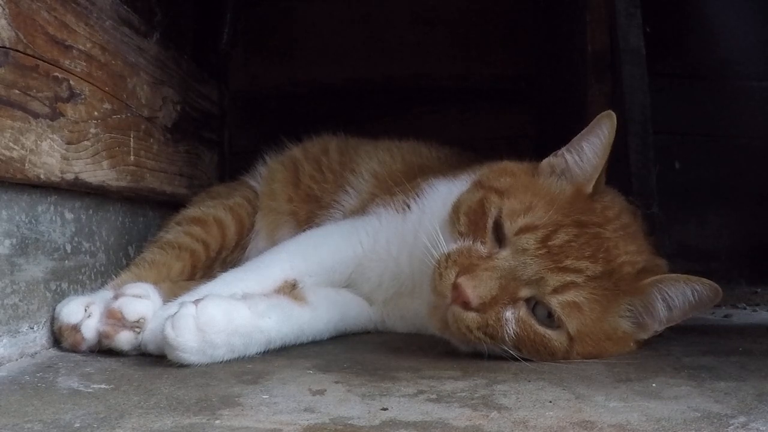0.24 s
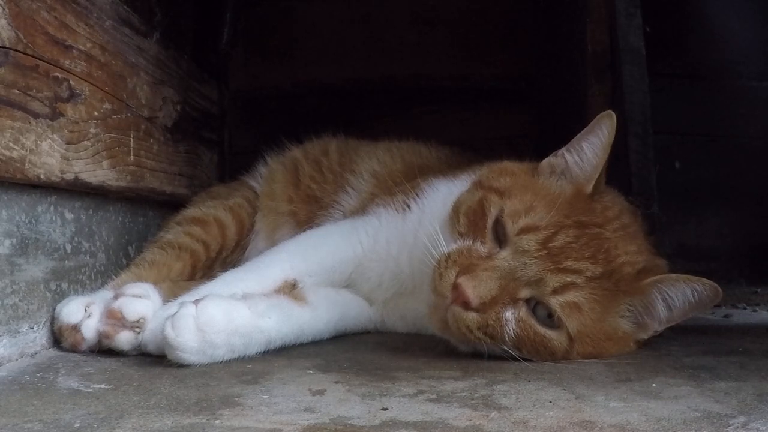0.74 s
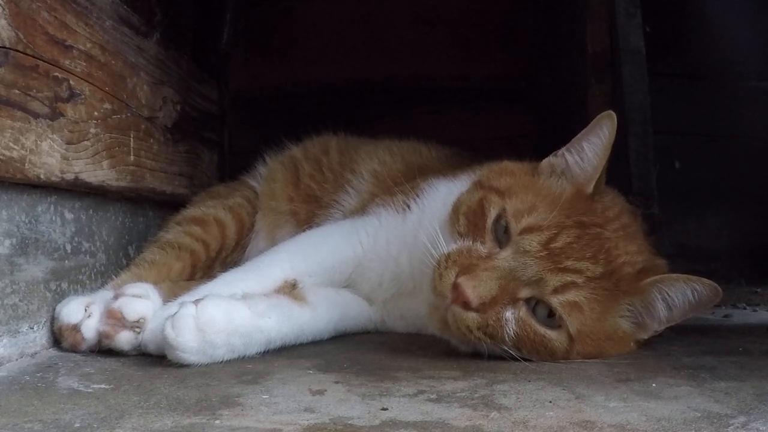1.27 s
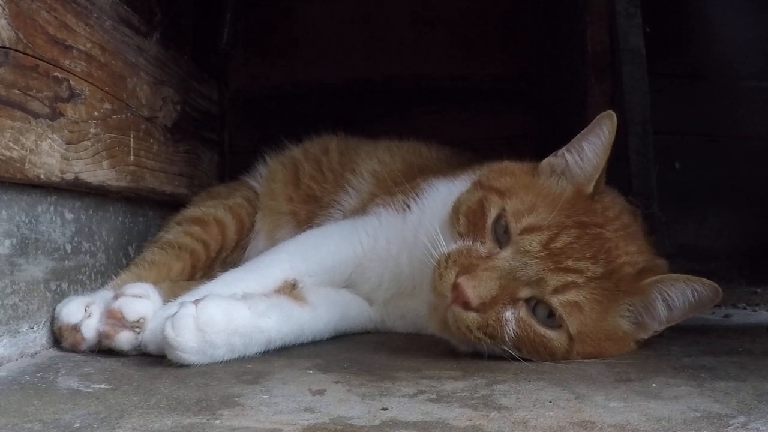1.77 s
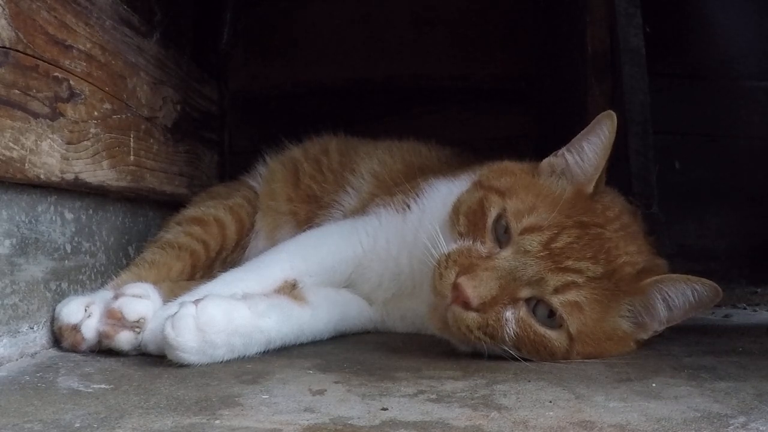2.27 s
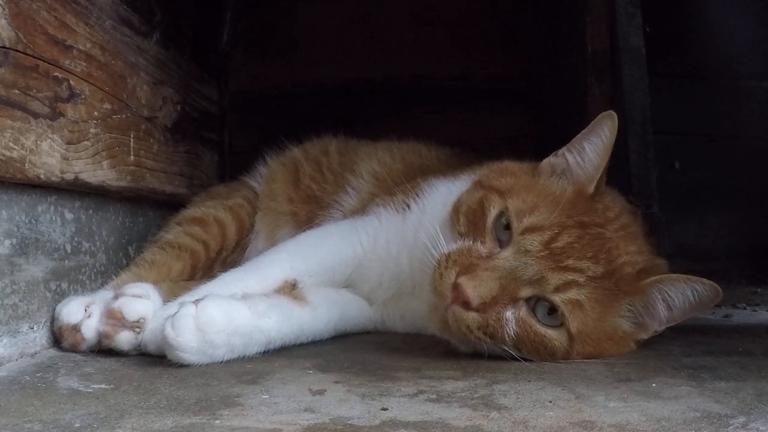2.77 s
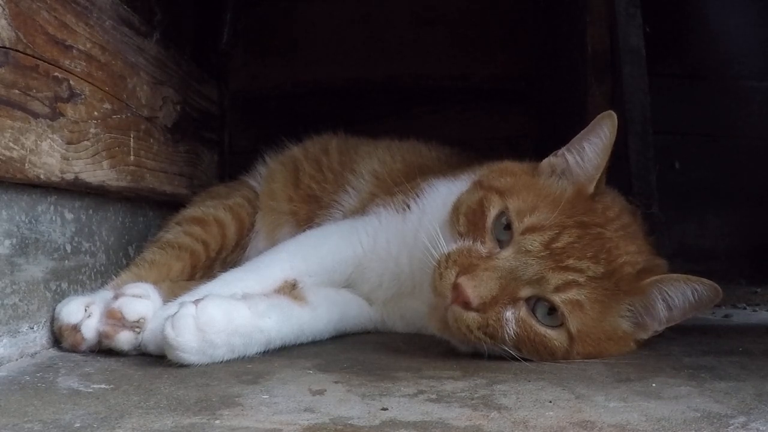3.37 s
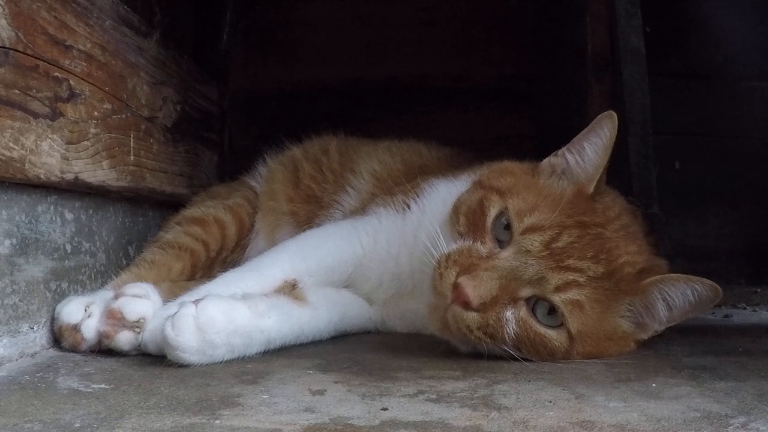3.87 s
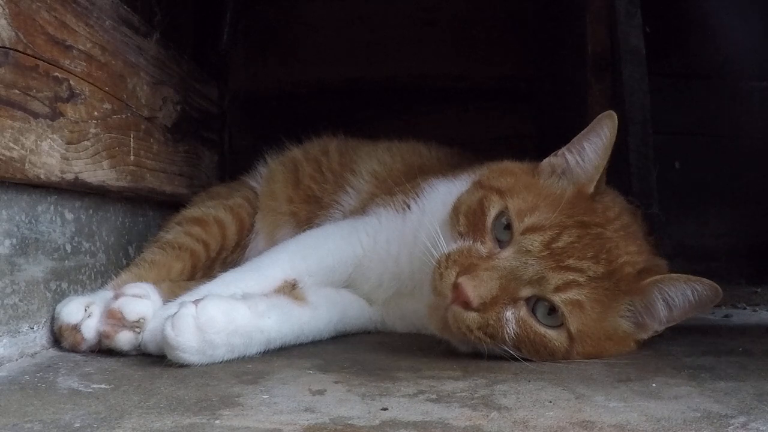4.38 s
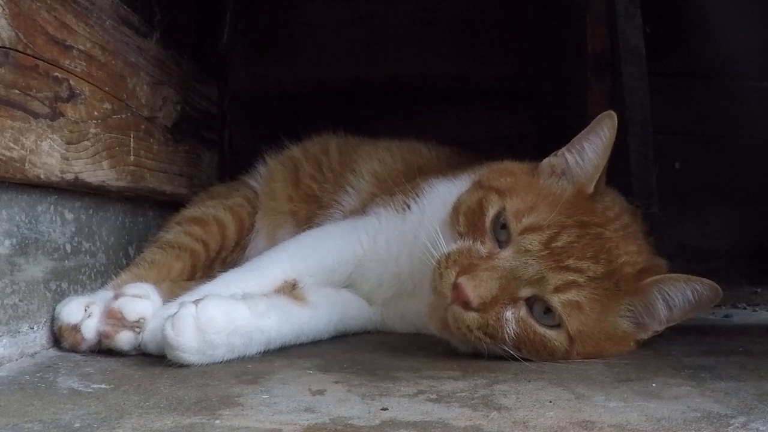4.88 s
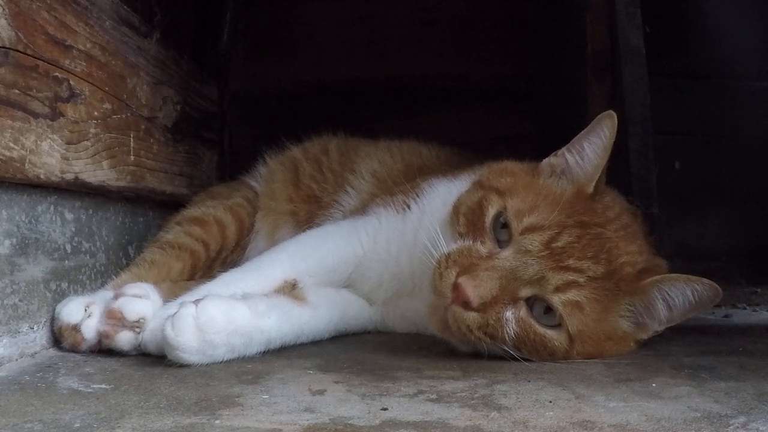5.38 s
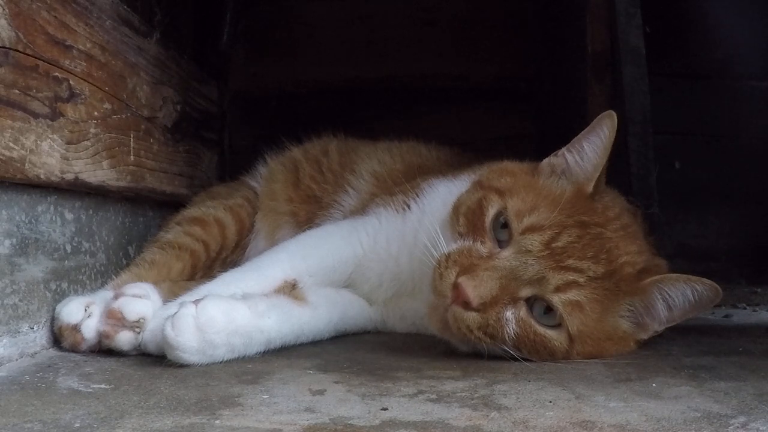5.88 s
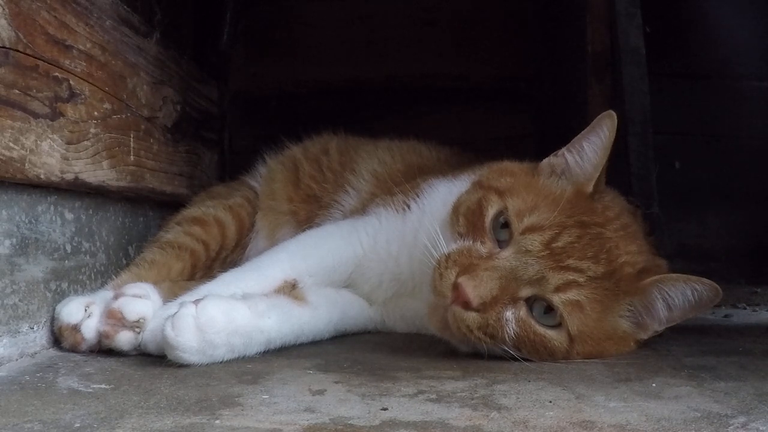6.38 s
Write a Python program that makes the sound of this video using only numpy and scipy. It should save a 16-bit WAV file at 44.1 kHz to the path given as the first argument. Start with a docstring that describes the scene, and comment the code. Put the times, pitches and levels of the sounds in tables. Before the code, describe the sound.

Outdoors on a sheltered step by a house among trees, a shrill cicada chorus runs unbroken for about 6.6 seconds, dense and fizzing around 5 to 8 kHz, a touch louder at first and then settling, with tiny surges at 0.4, 0.7 and 2.1 s. One nearer cicada buzzes over it, throbbing rapidly about sixteen times a second; its thin, ringing pitch near 6 kHz stands out clearest around 2.5 to 3.1 s and returns near 6 s. Faint small bird chips, each a quick downward chirp with brief echoes, come at 0.3, 1.8, 3.4, 5.5 and 6.6 s. Underneath is soft, wide outdoor air with a faint wavering machine hum. A soft low tone slides down intermittently from 0.2 to 0.85 s. A slight rumble swells around 1.1 s with a dull bump; others follow at 3.15 and 3.7 s. The lying cat makes no sound.

```python
"""A sheltered step by a house among trees, summer day: a far cicada chorus, one near cicada buzzing over it.
Timbal click trains ring a body filter; tone-plus-fuzz partials form the near one's throbbing shrill note.
The chorus mixes distinct click trains with shaped noise; a small bird chips five times, as falling sines.
Below: shaped-noise air, faint wavering hum, a soft low tone sliding down once, a rumble swell, dull bumps."""
import sys
import numpy as np
from scipy import signal
from scipy.fft import rfft, irfft, next_fast_len
from scipy.io import wavfile

SR = 44100
rng = np.random.default_rng(int(sys.argv[2]) if len(sys.argv) > 2 else 0)


def inscribe(sig):
    """Save sig as 16-bit PCM at rate SR to the path in sys.argv[1].

    A 1-D sig is mono; a 2-D sig holds one channel per row.
    Samples are clipped to [-1, 1] before scaling.
    """
    pcm = np.round(np.clip(np.atleast_2d(sig).T, -1, 1) * 32767)
    wavfile.write(sys.argv[1], SR, pcm.astype(np.int16))


N = 292486
T_S = np.arange(N) / SR
PADDED = next_fast_len(N, real=True)
F_HZ = np.fft.rfftfreq(PADDED, 1 / SR)

# near cicada's body resonances: f/Hz, width/Hz, relative level/dB
BODY_RESONANCES = [(5100, 240, -7), (5750, 180, -4), (5870, 260, -1), (6000, 200, -9), (6600, 220, -13),
                   (6880, 120, 1.5), (7330, 330, -9), (7750, 370, -8.5), (8240, 500, -13)]
# near cicada's note partials: multiple of stroke rate, fuzz width/Hz, relative level/dB, lag/throbs
NOTE_PARTIALS = [(31, 30, -5.5, 0), (31.17, 30, -3, 0), (32.05, 50, -11.5, 0), (33.08, 40, -9.5, .3),
                 (35, 25, -8.5, .3), (35.85, 50, -13, .2), (37.03, 20, -17.5, .35), (43.2, 70, -23, .5),
                 (44, 45, -17.5, .55)]
# throbbing note strength: t/s, level/dB
THROB_LEVEL = [(.5, -62), (1.5, -55.5), (3.1, -56), (3.7, -55), (5, -54), (6.6, -55.5)]
# strength of the note's unbroken tone: t/s, level/dB
CLEAR_LEVEL = [(1.1, -66), (1.8, -59), (2.3, -61), (2.55, -52), (3.08, -49.5), (3.25, -63), (5.3, -61),
               (6.2, -55), (6.6, -60)]
# cicadas further off: start rate/(strokes/s), end rate/(strokes/s), relative level/dB, left-right/dB
NEIGHBOURS = [(200.5, 204.5, -2, -1.5), (207.5, 209.5, -6, 1), (190.5, 192.5, -7, 0), (233.5, 236, -8, -1),
              (203.7, 203.1, -7, -7), (225, 227, -9, 1), (213, 215, -8, 2), (196.3, 196.6, -5, -2),
              (185, 187, -8, 0)]
# chorus spectrum: f/Hz, relative level/dB
CHORUS_SPECTRUM = [(3600, -43), (4300, -20), (4800, -11.5), (5200, -7), (5700, -3.5), (6300, 2),
                   (6950, -2.5), (7200, -2.5), (7800, -7), (8300, -14), (9100, -22.5), (11000, -56)]
# chorus placement by register: f/Hz, left-right/dB
CHORUS_SIDE = [(4400, -1.5), (5200, -0.5), (5800, -4.5), (6300, 1.5), (7000, 1.5), (7600, -1.5),
               (8200, -3.5), (9500, -4)]
# brief chorus surges: t/s, rise/dB
CHORUS_SURGES = [(.41, 1), (.71, 0.5), (2.14, 1)]
# outdoor background spectrum: f/Hz, relative level/dB
AIR_SPECTRUM = [(25, -24.5), (45, -27), (112, -33), (143, -1.5), (190, -0.5), (330, -5.5), (520, -7.5),
                (920, -9.5), (1400, -15), (2100, -21), (2900, -23), (3500, -27), (4100, -27), (9800, -25.5),
                (11500, -29), (15000, -30.5)]
# background likeness between ears: f/Hz, correlation
AIR_CORRELATION = [(100, 0.031), (270, -0.037), (380, -0.31), (520, -0.74), (800, -0.82), (1300, -0.74),
                   (2000, -0.44), (2700, 0.086), (3800, 0.79), (7000, -0.055)]
# wavering tones of a distant machine: f/Hz, level/dB, unsteadiness (ratio)
HUM_TONES = [(237, -67, 1.5), (284, -65, 1.5), (896, -68.8, .08), (1131, -77, .4)]
# sliding tone strength: t/s, level/dB
SLIDE_LEVEL = [(.21, -48), (.26, -51), (.315, -58), (.375, -48.5), (.43, -54), (.53, -57), (.585, -38.5),
               (.635, -59), (.69, -60), (.75, -47), (.88, -56)]
# bird chips: t/s, level/dB, pitch factor, length/s
CHIPS = [(0.343, -52, 1.03, 0.1), (1.827, -50, 0.98, .1), (3.352, -50.5, 0.99, .13),
         (5.519, -52, 0.98, 0.11), (6.594, -51, 0.91, .1)]
# soft low bumps: centre t/s, f/Hz, level/dB
BUMPS = [(1.15, 166, -50), (3.15, 159, -43.5), (3.67, 223, -43.5)]

# near cicada: starting stroke rate, full gain, time constant of the gain
START_STROKES_PER_S, GAIN_STROKES_PER_S, WARM_UP_S = 194.3, 5.6, 7.0
# starting throb rate, its steady rise, throb count at t = 0
START_THROBS_PER_S, THROB_RISE_PER_S2, START_THROBS = 16.168, .079, .51
# chorus: extra level at the start, its decay constant; surge width
SETTLE_DB, SETTLE_S, SURGE_S = 2, 3.3, 0.058
SLIDE_START_S, SLIDE_LENGTH_S, SLIDE_EDGE_S = .205, 0.65, 0.034
SLIDE_START_HZ, SLIDE_OCTAVES_PER_S = 454, 2.45
# chip glide before each chip's pitch factor
CHIP_TOP_HZ, CHIP_END_HZ, CHIP_DROP_S = 5380, 3095, .028
CHIP_EDGE_S, CHIP_HOLD_S, CHIP_FADE_DB_PER_S, CHIP_FLUTTER_DB = 0.014, 0.023, 134, 3.5
EDGE_HZ = 15230


def amp(db):
    """Decibels to gain."""
    return 10 ** (np.asarray(db) / 20)


def unit(x):
    """Scale to an rms of one."""
    return x / np.sqrt(np.mean(abs(x) ** 2) + 1e-20)


def curve(rows):
    """Time table joined by straight lines."""
    return np.interp(T_S, *np.transpose(rows))


def spectrum(rows):
    """Frequency table joined on a log axis."""
    hz, value = np.transpose(rows)
    return np.interp(np.log(F_HZ + 1), np.log(hz), value)


def colour(x, gain):
    """Filter by a gain per frequency."""
    return irfft(rfft(x, PADDED) * gain, PADDED)[..., :N]


def wander(rate_hz):
    """Smooth unit-rms noise with a Gaussian roll-off at about rate_hz."""
    return unit(colour(rng.standard_normal(N), np.exp(-.5 * (F_HZ / rate_hz) ** 2)))


def pan(side_db):
    """Left and right gains for a level difference."""
    return amp(np.array([[.5], [-.5]]) * side_db)


def gate(t_s, length_s, edge_s):
    """Attack, hold and release with equal linear edges."""
    return np.clip(np.minimum(t_s, length_s - t_s) / edge_s, 0, 1)


def yard(x, t60_s, direct):
    """Direct sound plus decaying echoes off leaves and walls, independent at each ear."""
    t_s = np.arange(SR // 2) / SR
    echoes = rng.standard_normal((2, len(t_s))) * np.exp(-np.log(1000) * t_s / t60_s)
    echoes /= np.linalg.norm(echoes, axis=1, keepdims=True)
    scattered = signal.oaconvolve(x[None], echoes, axes=1)[:, :N]
    return (direct * x + scattered) / np.hypot(1, direct)


def timbals(strokes_per_s, waver, jitter_strokes, second):
    """Each stroke snaps one timbal; the other, scaled by second, snaps half a stroke later, inverted."""
    rate = strokes_per_s * (1 + waver * wander(24.6))
    strokes = np.cumsum(rate) / SR + jitter_strokes * wander(130)
    step = np.exp(2j * np.pi * strokes)
    # only harmonics 22 to 47 radiate; the second timbal favours odd ones
    partial = np.exp(2j * np.pi * strokes * 21)
    clicks = np.zeros(N)
    for k in range(22, 48):
        partial = partial * step
        clicks += (1 - second * (-1) ** k) * partial.real
    return clicks


def stroke_rate():
    """Near cicada's strokes per second, rising ever more slowly."""
    return START_STROKES_PER_S + GAIN_STROKES_PER_S * (1 - np.exp(-T_S / WARM_UP_S))


def throb_count():
    """Near cicada's running throb count, from a linearly rising rate."""
    return np.cumsum(START_THROBS_PER_S + THROB_RISE_PER_S2 * T_S) / SR + START_THROBS


def near_cicada(throb_db=0.5, throb_wobble=0.0015):
    """Timbal clicks ring a hollow body; stroke rate and strength sway with each throb."""
    throb = np.cos(2 * np.pi * throb_count())
    rate = stroke_rate() * (1 + throb_wobble * throb)
    clicks = amp(throb_db * throb) * timbals(rate, waver=.0011, jitter_strokes=.002, second=.35)
    body_power = sum(amp(db) ** 2 / (1 + (2 * (F_HZ - hz) / width_hz) ** 2) ** 2
                     for hz, width_hz, db in BODY_RESONANCES)
    buzz = colour(clicks, np.sqrt(body_power))
    return amp(-56.0) * unit(yard(buzz, t60_s=0.14, direct=0.29))


def throbbing_note(waver=0.000905):
    """Partials locked to the strokes swell in turn each throb; the first also sounds unbroken."""
    strokes = np.cumsum(stroke_rate() * (1 + waver * wander(8.9))) / SR
    throbs = throb_count()
    ear_lag_rad = np.array([[0], [np.pi / 2]])  # echoes set the ears a quarter cycle apart
    note = np.zeros((2, N))
    for multiple, width_hz, db, lag_throbs in NOTE_PARTIALS:
        swell = .32 + .68 * np.cos(np.pi * (throbs - lag_throbs)) ** 4
        phase = 2 * np.pi * multiple * strokes - ear_lag_rad
        tone = np.sin(phase)
        a, b = colour(rng.standard_normal((2, 2, N)), 1 / (1 + (F_HZ / width_hz) ** 2))
        fuzz = a * tone + b * np.cos(phase)
        note += amp(db) * unit((unit(tone) + 0.8 * unit(fuzz)) * swell)
    clear = unit(np.cos(2 * np.pi * NOTE_PARTIALS[0][0] * strokes - ear_lag_rad))
    return pan(-1) * (amp(curve(THROB_LEVEL)) * note + amp(curve(CLEAR_LEVEL)) * clear)


def chorus(level_db=-43.5, flutter_db=0.42):
    """Distinct neighbours' click trains over countless far cicadas merged into shaped noise."""
    voice = amp(spectrum(CHORUS_SPECTRUM))
    far = colour(rng.standard_normal((2, N)), voice)
    neighbours = np.zeros((2, N))
    for first, last, db, side_db in NEIGHBOURS:
        rate = np.linspace(first, last, N) * (1 + .0008 * wander(1))
        clicks = timbals(rate, waver=.0013, jitter_strokes=.0015, second=0)
        buzz = yard(colour(clicks, voice), t60_s=0.12, direct=0.31)
        neighbours += amp(db) * pan(side_db) * unit(buzz)
    both = colour(unit(neighbours) + unit(far), pan(spectrum(CHORUS_SIDE)))
    settle_db = SETTLE_DB * np.exp(-T_S / SETTLE_S)
    surge_db = sum(db * np.exp(-((T_S - s) / SURGE_S) ** 2) for s, db in CHORUS_SURGES)
    return unit(both) * amp(level_db + settle_db + surge_db + flutter_db * wander(11))


def air(level_db=-46.5, swell_db=0.75):
    """Low rumble and thin hiss: noise with per-frequency ear correlation, wide in the middle register."""
    a, b = rng.standard_normal((2, N))
    same = np.clip(spectrum(AIR_CORRELATION), -1, 1)
    mid = colour(a, np.sqrt(1 + same))
    side = colour(b, np.sqrt(1 - same))
    ears = colour(np.array([mid + side, mid - side]), amp(spectrum(AIR_SPECTRUM)))
    return amp(level_db) * unit(ears) * amp(swell_db * wander(11.4))


def hum(width_hz=6):
    """Faint machine tones, each wavering in amplitude and phase by slow complex noise."""
    tones = np.zeros(N)
    for hz, db, unsteady in HUM_TONES:
        sway = 1 + unsteady * (wander(width_hz) + 1j * wander(width_hz))
        tones += amp(db) * unit((sway * np.exp(2j * np.pi * hz * T_S)).real)
    return pan(-0.99) * tones


def sliding_tone(waver=0.039):
    """A wavering low sine falls at a steady musical rate, comes and goes, blurred by echoes."""
    t_s = np.maximum(T_S - SLIDE_START_S, 0)
    hz = SLIDE_START_HZ * 2 ** (-SLIDE_OCTAVES_PER_S * t_s) * (1 + waver * wander(26.0))
    level = gate(t_s, SLIDE_LENGTH_S, SLIDE_EDGE_S) * amp(curve(SLIDE_LEVEL))
    tone = level * np.sin(2 * np.pi * np.cumsum(hz) / SR)
    return yard(tone, t60_s=.3, direct=2.6)


def bird(t60_s=0.34):
    """Chips: sines raspiest at the start, dropping fast and levelling out, trailing off in echoes."""
    calls = np.zeros(N)
    for start_s, db, pitch, length_s in CHIPS:
        t_s = np.maximum(T_S - start_s, 0)
        drop = np.exp(-t_s / CHIP_DROP_S)
        glide_hz = CHIP_END_HZ + (CHIP_TOP_HZ - CHIP_END_HZ) * drop
        rasp = 1 + (.08 + .05 * drop) * wander(550)
        fade_db = CHIP_FADE_DB_PER_S * np.maximum(t_s - CHIP_HOLD_S, 0)
        level = gate(t_s, length_s, CHIP_EDGE_S) * amp(db + CHIP_FLUTTER_DB * wander(90) - fade_db)
        calls += level * np.sin(2 * np.pi * np.cumsum(glide_hz * pitch * rasp) / SR)
    return yard(calls, t60_s, direct=.75)


def low_sounds(bump_s=0.02, swell_at_s=1.13, swell_s=0.24, swell_db=-56.0, swell_hz=160, swell_width_hz=28):
    """One brief swell of narrow-band rumble, and dull bumps: sines in Gaussian envelopes."""
    band = np.exp(-((F_HZ - swell_hz) / swell_width_hz) ** 2)
    rumble = unit(colour(rng.standard_normal(N), band))
    out = amp(swell_db) * rumble * np.exp(-((T_S - swell_at_s) / swell_s) ** 2)
    for centre_s, hz, db in BUMPS:
        t_s = T_S - centre_s
        out += amp(db) * np.exp(-(t_s / bump_s) ** 2) * np.sin(2 * np.pi * hz * t_s)
    return out


def scene():
    """Sum of all sources at the two ears."""
    cicadas = near_cicada() + throbbing_note() + chorus()
    return cicadas + air() + hum() + sliding_tone() + bird() + low_sounds()


def record(dry):
    """The recorder's band limit: a linear-phase low-pass at EDGE_HZ."""
    taps = signal.firwin(1001, EDGE_HZ, window=("kaiser", 9), fs=SR)
    return signal.oaconvolve(dry, taps[None], "same")


dry = scene()
out = record(dry)
inscribe(out)
```